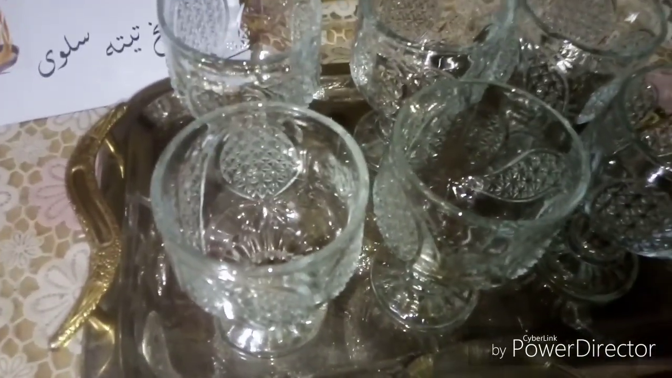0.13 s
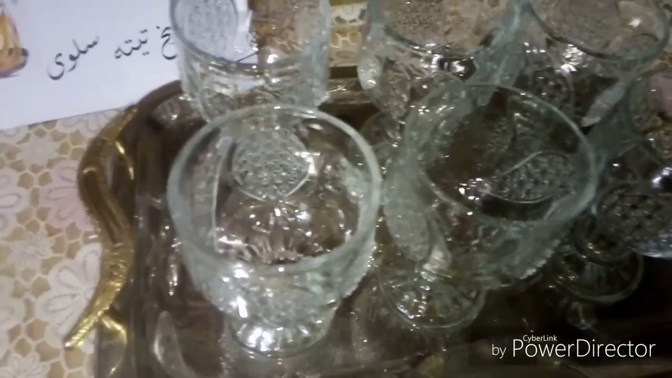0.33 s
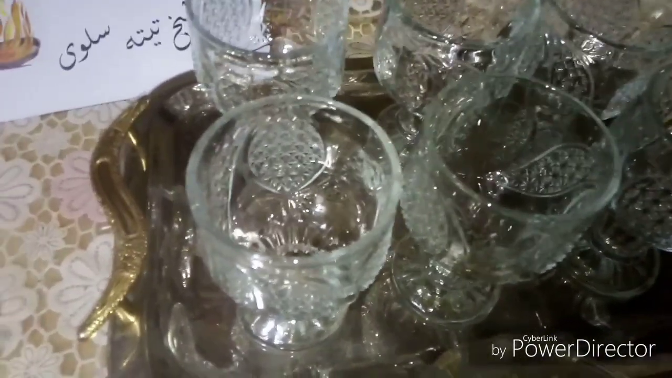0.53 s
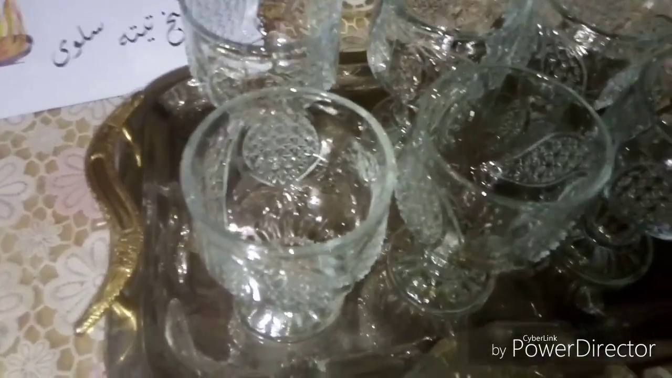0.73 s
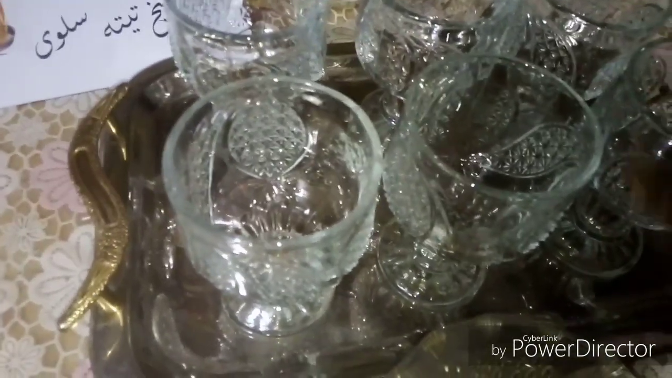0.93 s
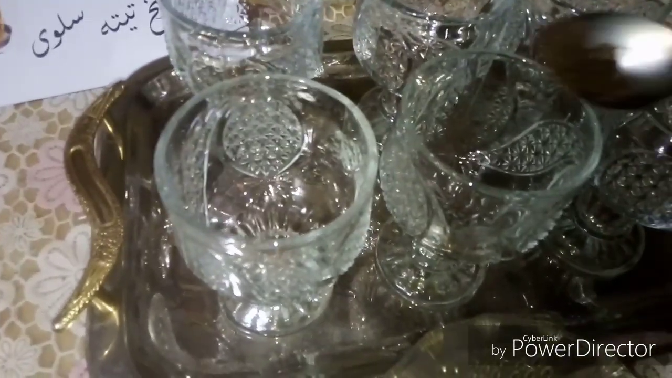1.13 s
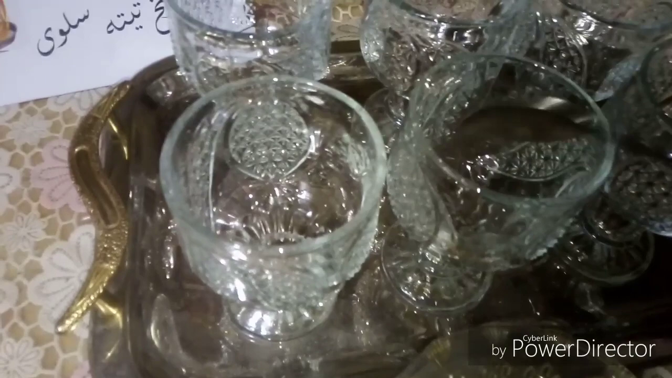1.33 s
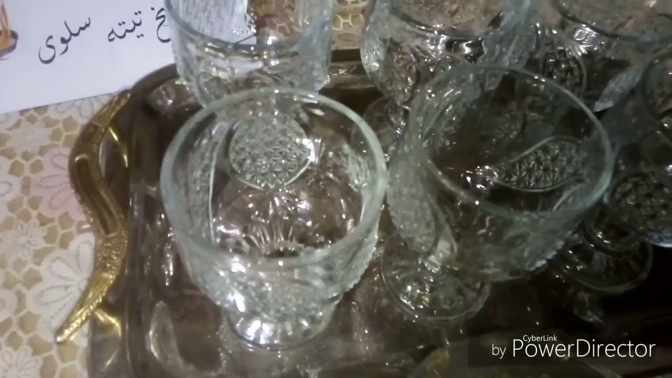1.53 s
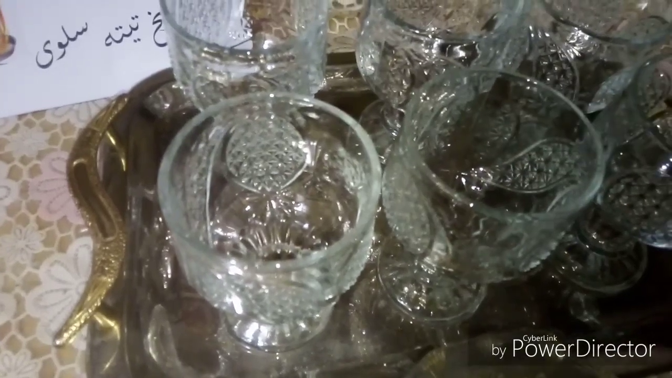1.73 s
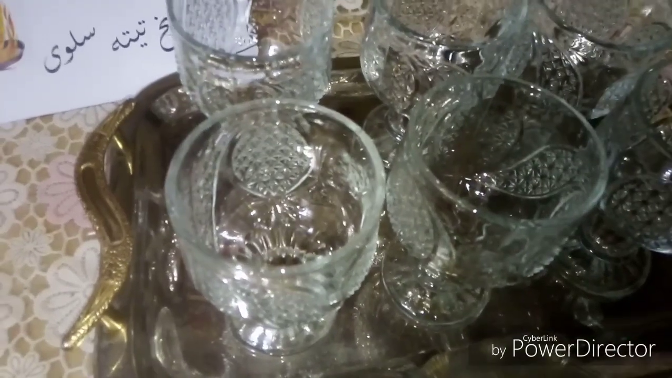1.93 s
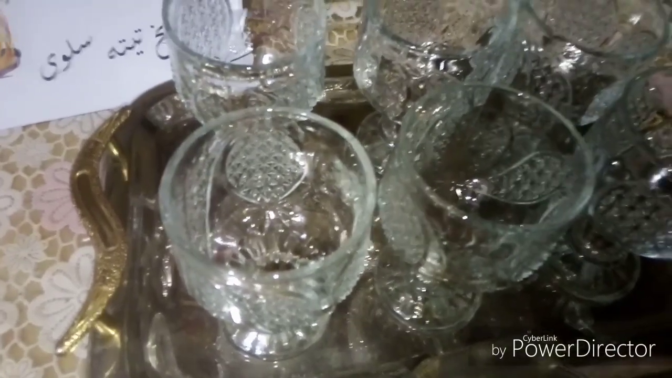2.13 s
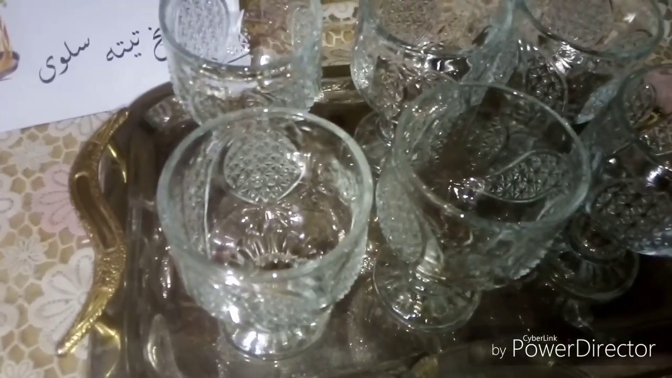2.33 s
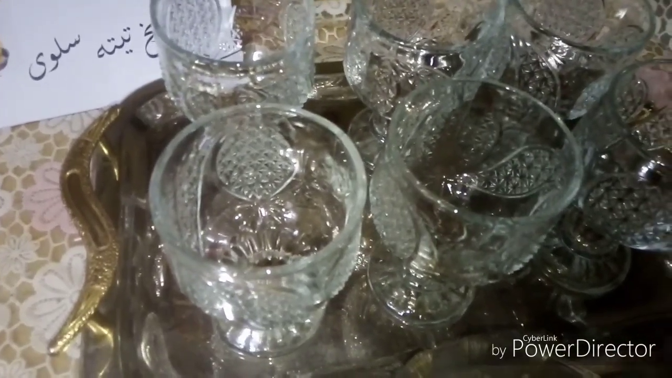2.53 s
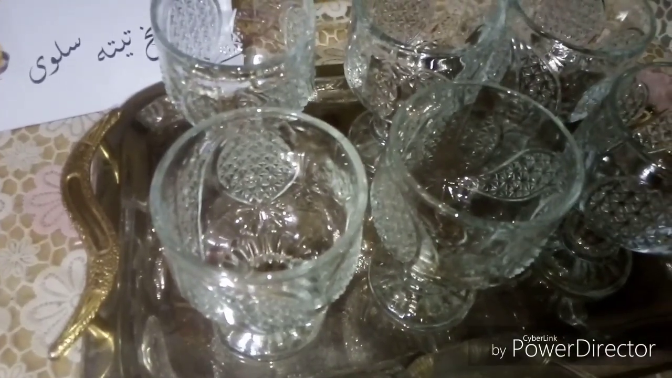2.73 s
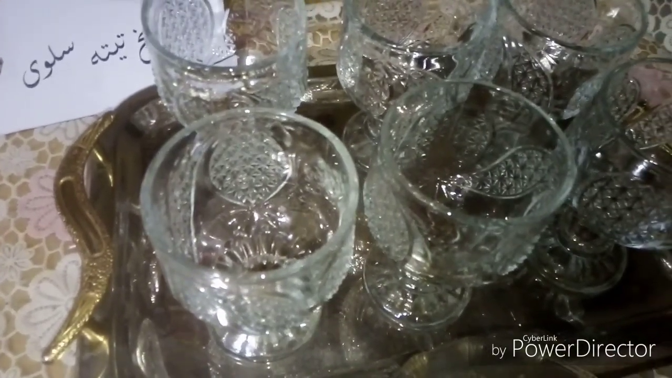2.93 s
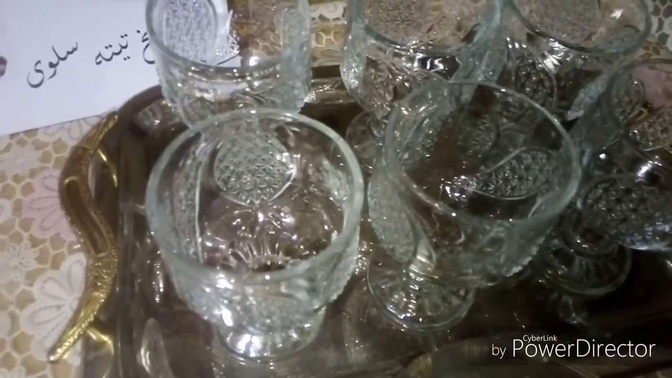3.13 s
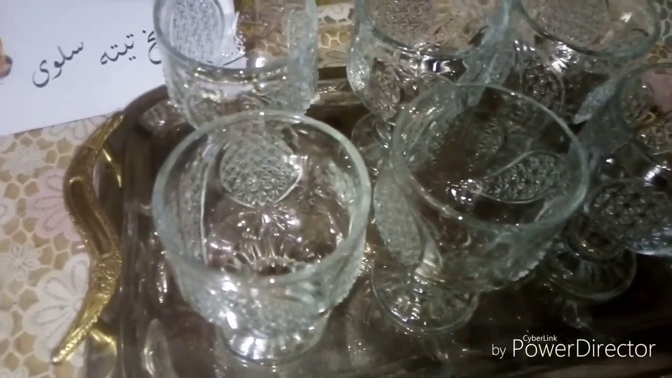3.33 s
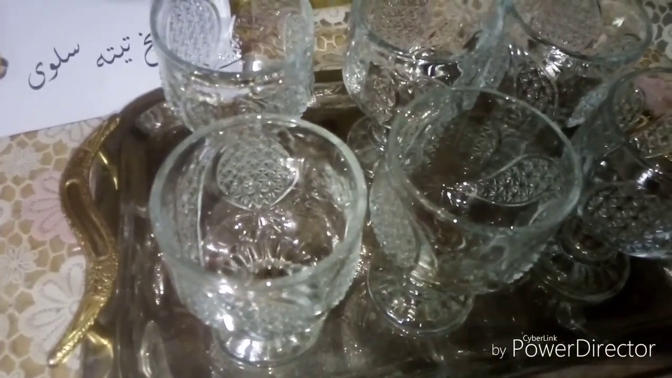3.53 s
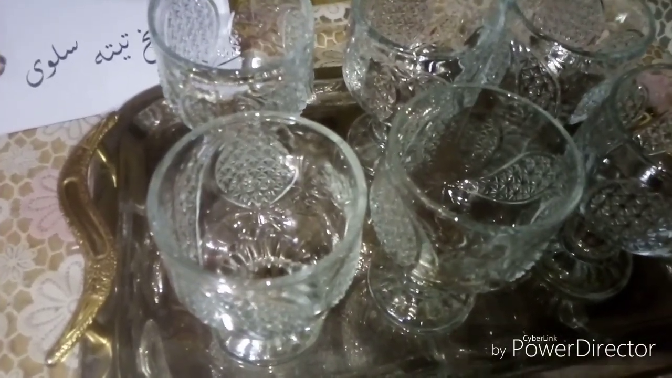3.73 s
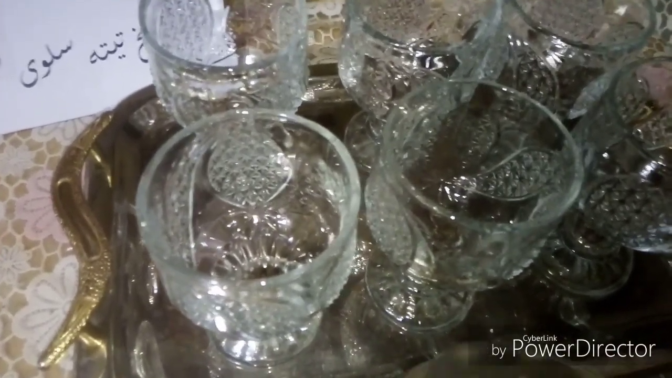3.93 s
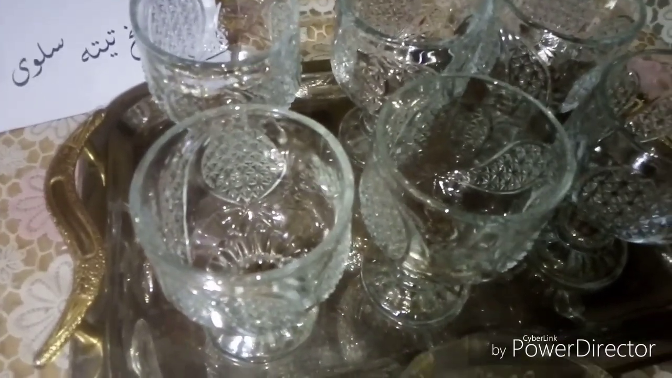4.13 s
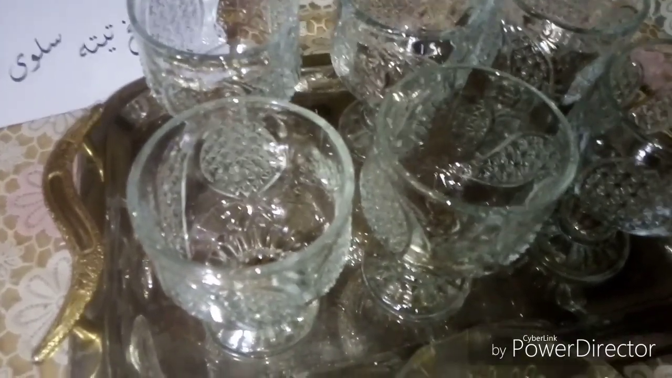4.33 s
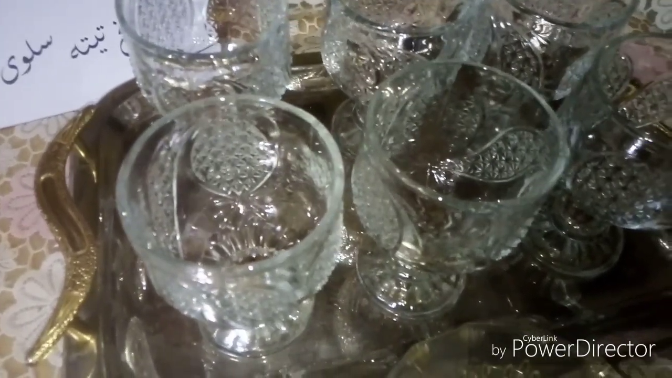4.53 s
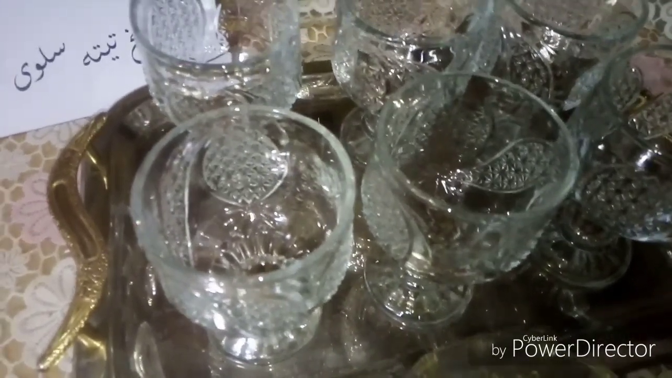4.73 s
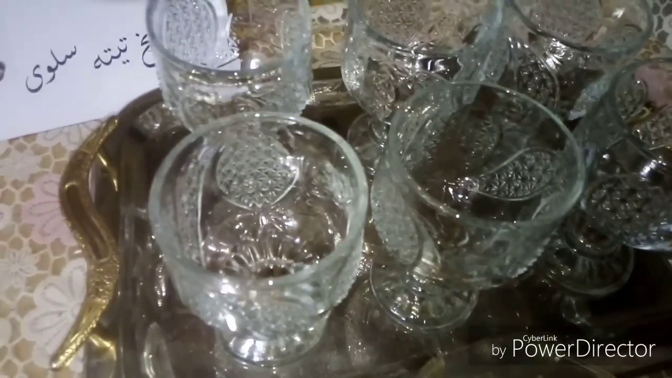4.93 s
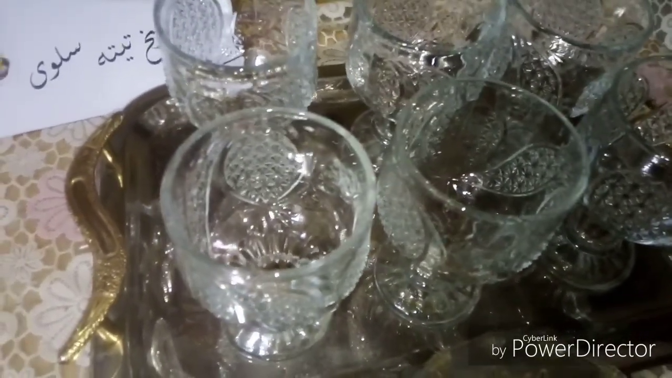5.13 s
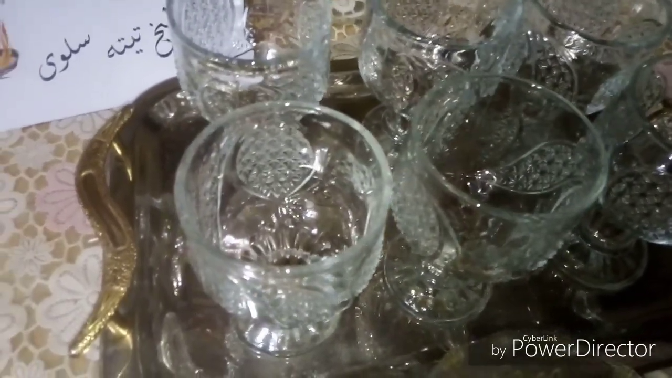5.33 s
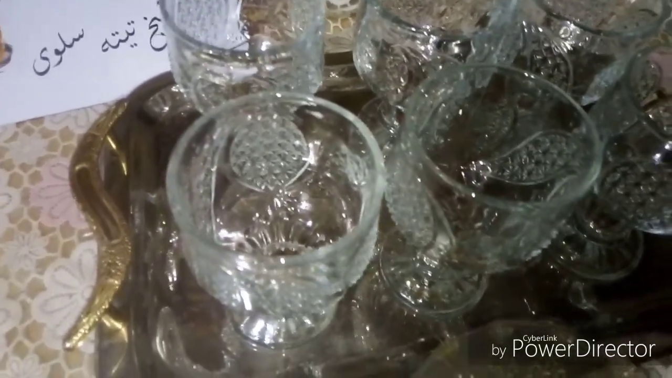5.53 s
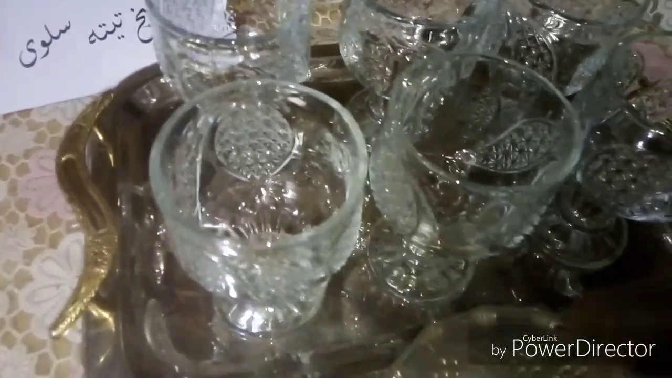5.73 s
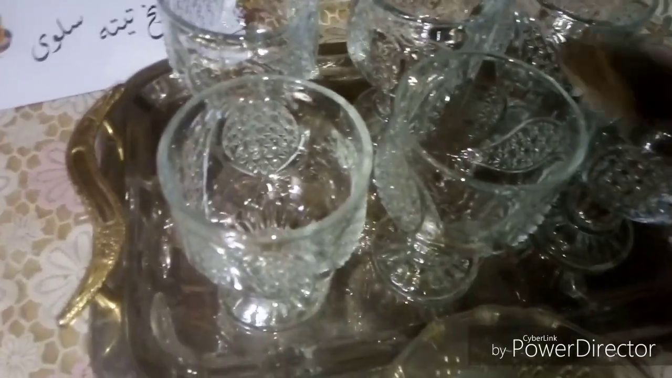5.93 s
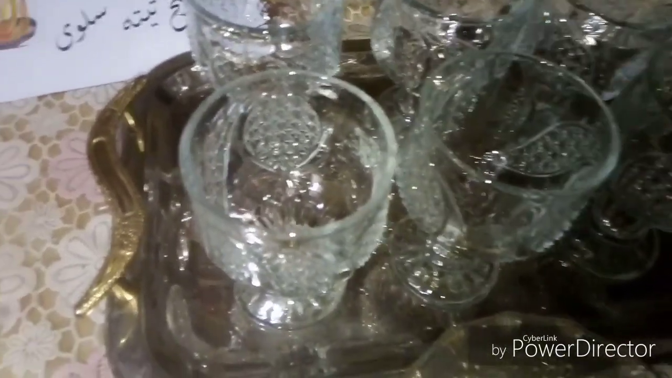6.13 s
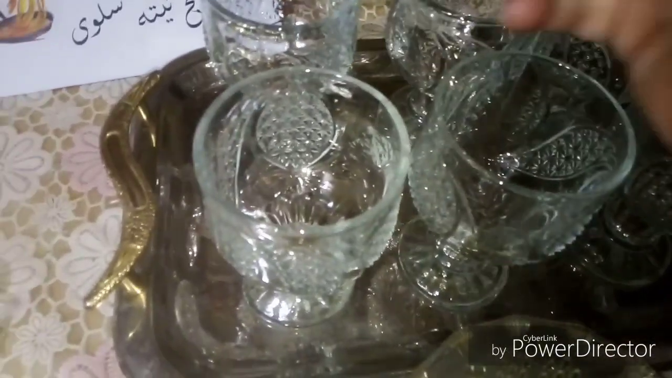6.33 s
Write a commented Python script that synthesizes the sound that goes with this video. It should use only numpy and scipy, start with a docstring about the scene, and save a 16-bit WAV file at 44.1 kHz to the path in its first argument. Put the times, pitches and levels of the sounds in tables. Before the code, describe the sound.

A small microphone sits close to a tray of glass dessert cups in a quiet kitchen, with a steady low hum and soft hiss. At the start, crumbs give a faint fizzing rustle with a tiny glassy squeak. At 1.2 seconds a metal spoon clinks on a cup, which rings clearly over a slight tray thud. A lighter clink comes at 1.9, then a quick cluster of loud, bright clinks from 2.1 to 2.3. Between 3.4 and 3.8 seconds the spoon knocks three times on a dull, hollow bowl, then digs into crumbs with a short crunch around 3.9. Faint ticks follow. Another loud clink lands at 4.7 and a lighter one at 4.9, followed by a soft rustle and faint touches until about 5.6. Each sound has a short room tail, and only the hum and hiss remain at the end.

```python
"""A quiet kitchen, one small microphone close to a tray of glass dessert cups.
A metal spoon serves crumbs. It clinks on two cups: the glass sings, the spoon rings, the tray thuds.
It knocks three times on a dull hollow bowl and digs into the crumbs with a crunch; twice there is
a soft fizzing rustle. A short room tail follows each sound; under it all lie a low hum and soft hiss."""
import sys
import numpy as np
from scipy import signal
from scipy.fft import rfft, irfft
from scipy.io import wavfile
from scipy.ndimage import uniform_filter1d

SR = 44100
rng = np.random.default_rng(int(sys.argv[2]) if len(sys.argv) > 2 else 0)


def generate_wav(signal):
    """Clip the signal to [-1, 1] and save it as 16-bit WAV at the path in sys.argv[1]."""
    frames = np.transpose(np.atleast_2d(signal))
    scaled = np.clip(frames, -1, 1) * 32767
    pcm = np.round(scaled).astype(np.int16)
    wavfile.write(sys.argv[1], SR, pcm)


N = 282240
T = np.arange(int(.7 * SR)) / SR  # time within one event [s]

# room tone, the low hum and the hiss: (frequency [Hz], level [dB])
HUM_SPECTRUM = [(20, -31), (55, -12.5), (80, -10.5), (108, 2), (155, 4), (190, -9.5), (235, -21),
                (300, -14), (400, -9.5), (500, -23), (700, -16.5), (1500, -64)]
HISS_SPECTRUM = [(300, -19), (500, -30.5), (750, -15), (1100, -7.5), (1600, -8.5), (2100, -10), (3100, -9),
                 (4300, -16), (5200, -10.5), (6000, -5.5), (6800, -15), (8000, -29), (14000, -32.5),
                 (15300, -43.5)]
# decay of the kitchen: (frequency [Hz], t60 [s])
ROOM_DECAY = [(100, 0.7), (1000, 0.55), (5000, 0.39), (9000, 0.25), (15000, 0.2)]
# air resonances in the cups and over the tray: (frequency [Hz], width [Hz], lift [dB])
AIR_RESONANCES = [(774, 2700, -1.5), (906.4, 130, 12), (1331, 210, 2.5), (1642, 950, 3.5), (2060, 45, 1.5),
                  (2420, 69, 8.5), (2640, 37, 9.5), (3077, 100, 6), (3500, 570, 4.5), (3790, 28, 7),
                  (4080, 28, 8), (4720, 31, 8.5), (4950, 19, 7.5), (6200, 47, 5)]
# the spoon being handled, and digging in crumbs: (time [s], level [dB], tilt [dB/octave], t60 [s])
HANDLING_TICKS = [(3.2244, -53, 18, 0.02), (3.441, -34, 7, 0.022), (3.621, -49, 7, 0.0098),
                  (4.185, -54.5, 21, 0.039), (4.407, -50.5, 26.5, .03), (4.923, -58.5, 6, 0.033),
                  (5.268, -49, 6, 0.037), (5.5614, -37.5, -1.5, 0.021)]
DIG_PUSHES = [(3.927, -35, 2.5, 0.19), (3.942, -27, -2, 0.12), (3.9502, -25, -6.5, 0.028),
              (3.975, -57, 4, 0.18), (4.003, -41, 2, 0.167)]
# loudness of two soft fizzing rustles; the second trails off in a faint hiss: (time [s], level [dB])
RUSTLE_LEVELS = [
    [(.052, -83), (.066, -59.5), (.115, -63), (.134, -56), (.145, -59), (.159, -55.5), (.185, -60),
     (.24, -60.5), (.265, -84)],
    [(4.9, -55), (4.93, -57), (4.975, -59), (5.0, -58), (5.03, -56.5), (5.065, -60.5), (5.12, -63),
     (5.25, -63.5)],
]
# tone of a tick, of breaking crumbs and of the rustle: (frequency [Hz], level [dB])
TICK_SPECTRUM = [(80, -24.5), (300, -14.5), (800, -10.5), (2300, -7), (3100, 9.5), (5000, 1), (6700, -0.5),
                 (7900, -35), (10000, -44), (16000, -49.5)]
CRUNCH_SPECTRUM = [(100, -35.5), (300, -15.5), (930, -10), (1430, -1.5), (1690, -8.5), (1900, -1.5),
                   (2060, 4.5), (2250, -4), (2500, -7.5), (3150, -1.5), (3700, -8.5), (6300, -12),
                   (8400, -33.5), (15000, -53)]
FIZZ_SPECTRUM = [(500, -16.5), (1500, -10), (2150, -6), (2650, -5), (3100, -2), (3900, -6), (5400, -10.5),
                 (6600, -3.5), (8000, -30), (9800, -74), (12000, -44), (15500, -39)]
# spoon on the bowl: (time [s], level [dB], tilt [dB/octave])
BOWL_KNOCKS = [(3.4442, -4, -0.5), (3.6234, -5, -1.5), (3.761, -8, -2.5)]
# a knock's blunt pulse and its hollow tail: (frequency [Hz], level [dB])
BLOW_SPECTRUM = [(30, -62.5), (65, -31.5), (130, 6.5), (250, -8), (400, 3), (750, 10.5), (1000, 2),
                 (1500, 9), (1900, -6), (2600, -24), (4500, -22), (8000, -36.5), (16000, -91)]
BOWL_TAIL_SPECTRUM = [(40, -15), (110, 14.5), (300, 7), (520, 2.5), (900, 5.5), (1500, -4), (2000, -4.5),
                      (2400, -13.5), (2900, -25.5), (6000, -25), (9000, -75.5)]
# modes of the bowl and of the hand-held spoon: (frequency [Hz], level [dB], t60 [s])
BOWL_MODES = [(107.6, -2, 0.2), (142, -1, 0.23), (174.3, 1.5, 0.12), (291.5, -5, .18), (323, 6, 0.085),
              (395, -10.5, 0.14), (559, -11, 0.29), (659.5, -6.5, 0.082), (767, -0.5, 0.12),
              (905, 8.5, 0.12), (997, 5.5, 0.0857), (1160, -1.5, 0.12), (1263, -6.5, .24),
              (1390, -2, 0.214), (1455, -3.5, 0.11), (1540, 5, 0.033), (1963, -10.5, 0.17),
              (2355, -10.5, 0.21)]
SPOON_MODES = [(1540, -14.5, .05), (1770, -9.5, .04), (3000, -2.5, 0.043), (3330, -5.5, 0.047),
               (4100, -6, 0.04), (5370, 2, 0.07), (6230, -3, 0.045)]
# spoon on glass; a hard blow rebounds within a few ms, and the rebound has its own row:
# (time [s], cup [index], ring [dB], crack [dB], lowest-mode lift near the rim [dB],
# ring time [factor], pitch shift [Hz], pair split [Hz], top-mode lift [dB],
# spoon ring [dB], tray thud [dB], crack tilt [dB/octave])
CUP_CLINKS = [(0.001, 0, -52, -80, 4.5, 2.4, 15, 20, -5, -57.5, -86, -3),
              (0.473, 0, -58, -86, -1, 3.1, 9, 14, -10, -84, -90, -2),
              (1.2011, 1, -18.5, -22, -13, 1.35, -0.5, 6.1, -4, -36, -37.5, 2.5),
              (1.8713, 0, -24.5, -41, -4, 0.61, 9, 69, -6, -52.5, -60, -3),
              (2.1156, 0, -48.5, -62.5, -0.5, 9, 18.5, 120, -9, -73.5, -88.5, -0.5),
              (2.1632, 0, -6, -40, -5.5, 0.094, 25.5, 110, -9, -32, -77, 5),
              (2.168, 0, -15, -53, -2.5, 0.59, 27, 77, -10.5, -46.5, -76.5, -0.5),
              (2.204, 0, -18.5, -27, 2.5, 0.69, -7.5, 90, -2.5, -36, -58, 3.5),
              (2.2725, 0, -1.5, -23.5, -1, 0.057, 7, 40, 7, -22.5, -65.5, 2.5),
              (2.2777, 0, -12, -35.5, 3, 0.9, 1, 2, 6, -28.5, -75, -4),
              (4.6834, 0, -3, -26.5, -8, 0.13, 2, 140, -10, -34, -37.5, 2),
              (4.6865, 0, -7.5, -34.5, -2.5, 0.85, 2, 78, -12.5, -37.5, -48.5, -1.5),
              (4.8752, 0, -26.5, -29.5, -6, 0.61, -4, 30, 1, -33, -50, -3),
              (5.027, 0, -34, -66, -21.5, 0.16, 20, 60, -30, -64, -85, -2),
              (5.2794, 0, -43.5, -65, 9, 0.87, -8, 22, -2, -49, -78.5, 6)]
# the contact crack, and the tray under a struck cup: (frequency [Hz], level [dB])
CRACK_SPECTRUM = [(200, -25), (800, -26.5), (1250, -11), (2000, 0), (3000, 2), (4200, 1.5), (5600, 5.5),
                  (6700, 3), (7400, -2), (9300, -11.5), (11200, -19), (14500, -9.5), (17000, -18)]
TRAY_SPECTRUM = [(100, -20.5), (380, 6), (600, -7.5), (880, 10), (1200, 10.5), (1900, -4.5), (4000, -32.5)]
# flutter of the ring while the spoon still grazes the rim: (rate [Hz], level [dB])
FLUTTER_SPECTRUM = [(10, -10), (45, 0), (130, -3), (300, -18), (900, -60)]
# bending modes, split by the cut pattern, one list a cup: (frequency [Hz], level [dB], t60 [s])
CUP_MODES = [
    [(2309, -11.5, .21), (2345, -18, .08), (4572, -24, .14), (4760, -21, .09), (4880, -16, .05),
     (5142, -12, .09), (5408, 1, .07), (5590, -14, .06), (5770, -18, .07), (6058, -23, .1),
     (6390, -26, .13), (6620, -22, .06), (7850, -31, .06), (8045, -28, .17), (10295, -23, .13),
     (10545, -23, .17), (13420, -26, .06), (15000, -29, .05)],
    [(1728, -42, .5), (2806, -2, .39), (2812, -13, .3), (5720, -15, .1), (6180, -23, .15), (6450, -5, .19),
     (6590, -16, .06), (7289, -25, .11), (7698, -28, .13), (11140, -39, .11), (13500, -19, .06)],
]
# each cup's bright pair, which beats when the spoon's touch splits it: (centre [Hz], level [dB], t60 [s])
BRIGHT_PAIRS = [(5376, -13.5, 0.26), (6452, -13.5, .22)]


def amp(db):
    """Decibels to gain."""
    return 10 ** (np.asarray(db) / 20)


def unit(x):
    """Scales to rms 1."""
    return x / np.sqrt(np.mean(x ** 2) + 1e-20)


def read(points, hz):
    """Reads a table on a log-frequency axis."""
    f, value = np.transpose(points)
    return np.interp(np.log(hz + 1), np.log(f + 1), value)


def add(mix, s, sound):
    """Mixes a sound in at s seconds."""
    part = mix[max(round(s * SR), 0):][:len(sound)]
    part += sound[:len(part)]


def fade(t60):
    """Falls by 60 dB in t60 seconds."""
    return np.exp(-np.log(1000) * T / t60)


def rise(seconds):
    """Climbs from 0 towards 1 with this time constant."""
    return 1 - np.exp(-T / seconds)


def shape(points, size, tilt=0):
    """Gain per FFT bin, tilted about 3 kHz in dB per octave."""
    hz = np.fft.rfftfreq(size, 1 / SR)
    return amp(read(points, hz) + tilt * np.log2((hz + 100) / 3000))


def colour(x, points, tilt=0):
    """Gives x a spectrum, at rms 1."""
    return unit(irfft(rfft(x) * shape(points, len(x), tilt), len(x)))


def noise(points, size=len(T), tilt=0):
    """Coloured noise of rms 1."""
    return colour(rng.standard_normal(size), points, tilt)


def pulse(points, tilt=0):
    """A minimum-phase click of the given spectrum, peak 1."""
    cepstrum = irfft(np.log(shape(points, len(T), tilt)), len(T))
    cepstrum[1:len(T) // 2] *= 2
    cepstrum[len(T) // 2 + 1:] = 0
    click = irfft(np.exp(rfft(cepstrum)), len(T))
    return click / abs(click).max()


def excite(drive, response):
    """Plays drive through an impulse response scaled to unit energy."""
    return signal.fftconvolve(drive, response / np.linalg.norm(response))


def burst(points, t60, tilt=0):
    """A dying puff of noise sent through a spectrum."""
    return excite(rng.standard_normal(len(T)) * fade(t60), pulse(points, tilt))[:len(T)]


def grains(per_s, spread_db):
    """A dense, grainy hiss of tiny clicks, rms 1."""
    strength = amp(spread_db * np.minimum(rng.exponential(1, len(T)), 4))
    return unit(rng.standard_normal(len(T)) * strength * (rng.random(len(T)) < per_s / SR))


def hollow(x):
    """Air in the glassware rings along with x, at rms 1."""
    hz = np.fft.rfftfreq(len(x), 1 / SR)
    lift_db = sum(db / (1 + (2 * (hz - f) / width) ** 2) for f, width, db in AIR_RESONANCES)
    return unit(irfft(rfft(x) * amp(lift_db), len(x)))


def patchy(x, depth_db):
    """Lets narrow bands drift up and down on their own, at rms 1."""
    bands = signal.stft(x, nperseg=1024, noverlap=768)[2]
    drift = rng.standard_normal(bands.shape)
    for _ in range(2):
        drift = uniform_filter1d(uniform_filter1d(drift, size=3, axis=0), size=22, axis=1)
    bands *= amp(depth_db * unit(drift))
    return unit(signal.istft(bands, nperseg=1024, noverlap=768)[1][:len(x)])


def room_tone(hum_db=-56.5, hiss_db=-67):
    """Behind everything, a low hum and a soft hiss that wavers in patches."""
    waver_db = .7 * noise([(1, 0), (4, -6), (12, -30), (40, -90)], N)
    hum = amp(hum_db) * noise(HUM_SPECTRUM, N)
    hiss = patchy(hollow(noise(HISS_SPECTRUM, N)), depth_db=3.2)
    return hum + amp(hiss_db + waver_db) * hiss


def kitchen(x, build_s=.006, early_db=-8, reflections=6):
    """A few early reflections and the dense tail of a small room, the treble dying first."""
    hz, t, bands = signal.stft(rng.standard_normal(len(T)), SR, nperseg=256)
    bands *= np.exp(-np.log(1000) * t / read(ROOM_DECAY, hz)[:, None])
    tail = signal.istft(bands, SR, nperseg=256)[1][:len(T)] * rise(build_s)
    tail /= np.linalg.norm(tail)
    arrivals = (rng.uniform(.003, .02, size=reflections) * SR).astype(int)
    tail[arrivals] += amp(early_db) * rng.choice([-1, 1], size=reflections) / np.sqrt(reflections)
    return signal.fftconvolve(x, tail)[:N]


def ticks():
    """Small dry contacts of the handled spoon that set nothing ringing."""
    out = np.zeros(N)
    for s, db, tilt, t60 in HANDLING_TICKS:
        add(out, s, amp(db) * burst(TICK_SPECTRUM, t60, tilt))
    return out


def squeak(start_s=.031, length_s=.09, centre_hz=2230, width_hz=85, db=-56):
    """A brief, rough, glassy note as the spoon's edge catches and drags."""
    out = np.zeros(N)
    hz = np.fft.rfftfreq(len(T), 1 / SR)
    resonance = 1 / (1 + (2 * (hz - centre_hz) / width_hz) ** 2)
    note = unit(irfft(rfft(rng.standard_normal(len(T))) * resonance, len(T)))
    swell = np.sin(np.pi * np.minimum(T / length_s, 1))
    add(out, start_s, amp(db) * note * swell)
    return out


def rustles(loud_db=-51, loud_sing_db=15.5, sing_per_db=1.5):
    """A soft fizzing rustle; the louder it gets, the more the cup sings along."""
    out = np.zeros(N)
    cup = sum(amp(db) * fade(t60 / 2) * np.sin(2 * np.pi * hz * T) for hz, db, t60 in CUP_MODES[0])
    for contour in RUSTLE_LEVELS:
        times, levels = np.transpose(contour)
        level_db = np.interp(times[0] + T, times, levels, right=-120)
        drive = amp(level_db) * grains(per_s=22000, spread_db=3.5)
        fizz = excite(drive, pulse(FIZZ_SPECTRUM))
        sing = excite(drive * amp(loud_sing_db + sing_per_db * (level_db - loud_db)), cup)
        add(out, times[0], fizz + sing)
    return out


def digs(rise_s=.00089):
    """Each push of the spoon breaks a quick cluster of crumbs."""
    out = np.zeros(N)
    for s, db, tilt, t60 in DIG_PUSHES:
        crunch = colour(grains(per_s=9300, spread_db=-1), CRUNCH_SPECTRUM, tilt)
        add(out, s, amp(db) * crunch * fade(t60) * rise(rise_s))
    return out


def nudge(start_s=3.995, db=-43, t60=.36, rise_s=.0025):
    """The bowl shifts on the table with a soft low thud as the spoon digs."""
    out = np.zeros(N)
    add(out, start_s, amp(db) * noise(HUM_SPECTRUM) * fade(t60) * rise(rise_s))
    return out


def knocks(modes_db=-26, tail_db=-18.5, tail_t60=.17, bounce_s=.00265, bounce_db=-8, rise_s=.000413):
    """Spoon on bowl: a blunt pulse, its bounce off the table, short modes and a dense hollow tail."""
    out = np.zeros(N)
    ring = sum(amp(db) * fade(t60) * np.cos(2 * np.pi * hz * T) for hz, db, t60 in BOWL_MODES)
    tail = noise(BOWL_TAIL_SPECTRUM) * fade(tail_t60)
    body = (amp(modes_db) * ring + amp(tail_db) * tail) * rise(rise_s) ** 2
    for s, db, tilt in BOWL_KNOCKS:
        blow = amp(db) * pulse(BLOW_SPECTRUM, tilt)
        add(out, s, blow + amp(db) * body)
        add(out, s + bounce_s, amp(bounce_db) * blow)
    # keeps the knocks dull and hollow, between 70 Hz and 9 kHz
    return signal.sosfilt(signal.butter(4, [70, 9000], "bandpass", fs=SR, output="sos"), out)


def contacts(snap_t60=.04, glassware_db=-7, glassware_t60=.085, tray_t60=.17):
    """Each contact with a cup cracks, thuds into the tray and sets the spoon ringing."""
    out = np.zeros(N)
    for s, _, _, crack_db, *_, spoon_db, thud_db, tilt in CUP_CLINKS:
        spoon = sum(amp(db) * fade(t60) * np.sin(2 * np.pi * (hz * T + rng.random()))
                    for hz, db, t60 in SPOON_MODES)
        snap = burst(CRACK_SPECTRUM, snap_t60, tilt) + pulse(CRACK_SPECTRUM, tilt)
        # the glassware around answers, duller
        glassware = hollow(hollow(noise(CRACK_SPECTRUM, tilt=tilt - 6))) * fade(glassware_t60)
        answer = amp(crack_db + glassware_db) * glassware + amp(spoon_db) * spoon
        thud = amp(thud_db) * burst(TRAY_SPECTRUM, tray_t60)
        add(out, s, amp(crack_db) * snap + answer * rise(.0003) + thud)
    return out


def cup_rings(rise_cycles=4, top_hz=7500, partner_db=-4.5, chatter=.85, chatter_t60=.5):
    """A struck cup sings; the spot hit weights its modes; the touch damps, roughens and splits them."""
    out = np.zeros(N)
    for s, cup, ring_db, _, rim_db, hold, shift_hz, split_hz, top_db, *_ in CUP_CLINKS:
        modes = CUP_MODES[cup]
        tuning = 1 + shift_hz / modes[0][0]
        centre_hz, pair_db, pair_t60 = BRIGHT_PAIRS[cup]
        pair = [(centre_hz + split_hz / 2, pair_db, pair_t60),
                (centre_hz - split_hz / 2, pair_db + partner_db, pair_t60)]
        # a ring cut short also flutters while the spoon grazes the rim
        graze = 1 + chatter * np.clip(1 - hold, 0, 1) * fade(chatter_t60) * noise(FLUTTER_SPECTRUM)
        for k, (hz, db, t60) in enumerate(modes + pair):
            swing = graze * fade(t60 * hold) * rise(rise_cycles / hz)  # low modes build up slower
            chance_db = rng.standard_normal() * hz / 9000  # fine modes depend most on the spot struck
            gain = amp(ring_db + db + rim_db * (k == 0) + top_db * (hz > top_hz) + chance_db)
            add(out, s, gain * swing * np.sin(2 * np.pi * hz * tuning * T))
    return out


def scene():
    """Spoon, cups and bowl close to the microphone, with a little kitchen and room tone behind."""
    glass, metal = cup_rings(), contacts()
    bowl = knocks() + nudge()
    serving = digs() + rustles() + squeak() + ticks()
    room = kitchen(amp(-21) * glass + amp(-14) * metal + amp(-24) * bowl + amp(-13) * serving)
    return (glass + metal + bowl + serving + room + room_tone())[None]


def record(dry):
    """The small microphone loses the deepest bass; the treble ends at 16.4 kHz."""
    low_cut = signal.butter(3, 62, "highpass", fs=SR, output="sos")
    high_cut = signal.firwin(255, 16400, window=("kaiser", 9), fs=SR)
    return signal.oaconvolve(signal.sosfilt(low_cut, dry), high_cut[None], "same")


dry = scene()
out = record(dry)
generate_wav(out)
```